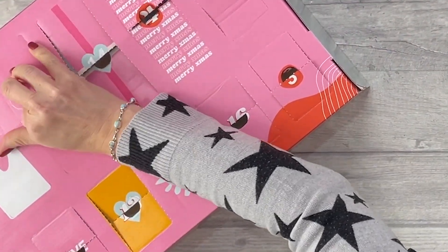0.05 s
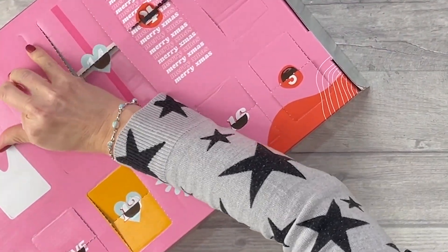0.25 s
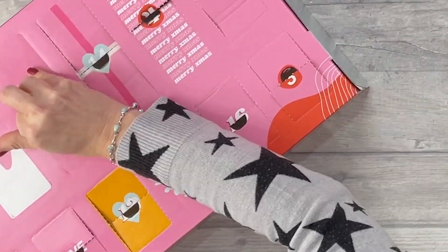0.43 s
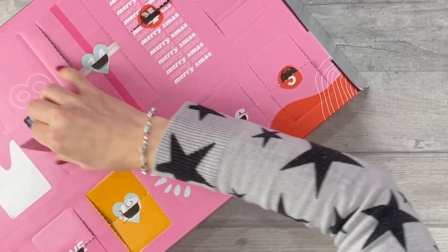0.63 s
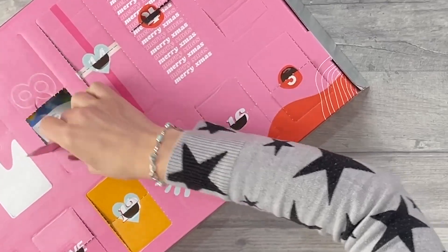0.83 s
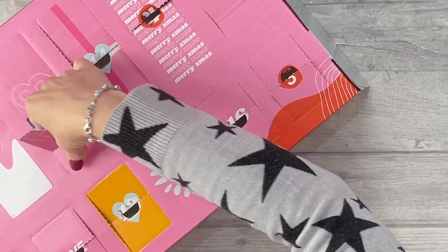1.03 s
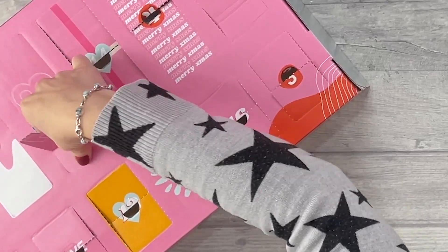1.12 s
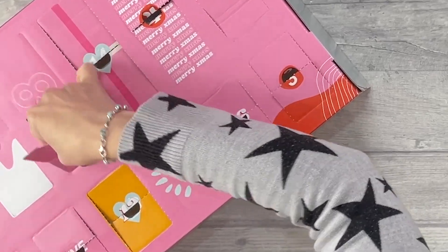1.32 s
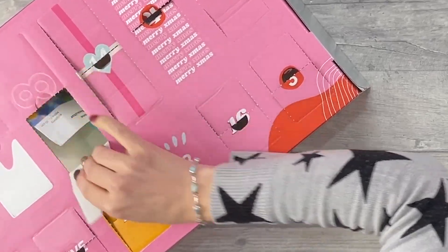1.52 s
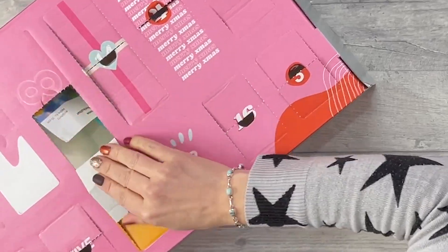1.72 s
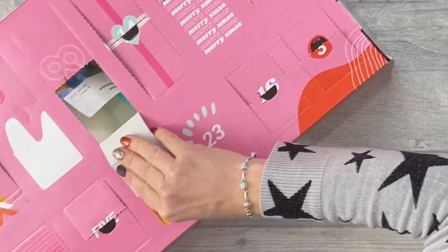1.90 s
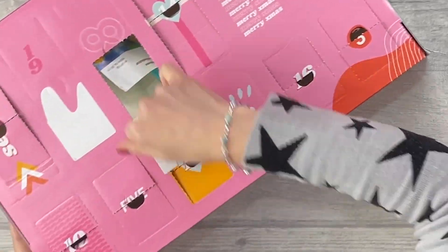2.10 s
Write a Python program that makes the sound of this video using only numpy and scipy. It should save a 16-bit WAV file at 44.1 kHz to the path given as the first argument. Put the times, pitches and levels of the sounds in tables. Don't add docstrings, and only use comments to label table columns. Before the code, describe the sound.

Perforated cardboard torn open: one loud hollow pop, small fumbles, a crackling rip, then a palm rub

```python
import sys
import numpy as np
from scipy import signal
from scipy.fft import rfft, irfft, next_fast_len
from scipy.io import wavfile
from scipy.ndimage import uniform_filter1d, map_coordinates

SR = 44100
rng = np.random.default_rng(int(sys.argv[2]) if len(sys.argv) > 2 else 0)


def volts_from_decibels(level):
    exponent = np.asarray(level, float) / 20
    return 10 ** exponent


def store_wav(level_fs):
    pcm = np.round(np.clip(np.atleast_2d(level_fs), -1, 1) * 32767)
    wavfile.write(sys.argv[1], SR, pcm.T.astype(np.int16))


N = 94815


def unit(x):
    return x / np.sqrt(np.mean(x ** 2) + 1e-20)


def along(points, hz):
    f, v = np.transpose(points)
    return np.interp(np.log(hz + 1), np.log(f + 1), v)


def filtered(x, response):
    n = x.shape[-1]
    m = next_fast_len(n + 4096)
    return irfft(rfft(x, m) * response(np.fft.rfftfreq(m, 1 / SR)), m)[..., :n]


def coloured(x, spectrum):
    return filtered(x, lambda f: volts_from_decibels(along(spectrum, f)))


def peak(f, centre_hz, width_hz):
    return 1j * f * width_hz / (centre_hz ** 2 - f * f + 1j * f * width_hz)


def add(track, start_s, sound):
    i = round(start_s * SR)
    part = track[max(i, 0):][:len(sound) + min(i, 0)]
    part += sound[max(-i, 0):][:len(part)]


# level/dB, f/Hz
TREBLE_LIMIT = [(-21, 16000), (-11.5, 54000)]


def dulled(f, db):
    ratio = f / np.interp(db, *np.transpose(TREBLE_LIMIT))
    return 1 / (1.5 + 1.2j * ratio - ratio ** 2) ** 2


def gritty(n, grain_db):
    grain_samples = 24
    strength = np.minimum(rng.exponential(1, n // grain_samples + 1), 3)
    strength = np.repeat(strength, grain_samples)[:n]
    return unit(rng.standard_normal(n) * volts_from_decibels(grain_db * strength))


# f/Hz, coherence/1
COHERENCE = [(60, 0.95), (240, 0.96), (950, 1), (3770, 1), (15000, 0.37)]


def pair(x):
    def split(hz):
        angle = np.arccos(np.clip(along(COHERENCE, hz), -1, 1)) / 2
        return np.array([np.cos(angle), np.sin(angle)])

    mid, side = filtered(x, split)
    return np.array([mid + side, mid - side])


# f/Hz, density/(dB/Hz)
AIR_SPECTRUM = [(60, -10), (300, -10.5), (1200, -20.5), (2200, -26.5), (5000, -27.5), (11500, -31),
                (13500, -41.5)]
# f/Hz, density/(dB/Hz)
RUMBLE_SPECTRUM = [(15, -3), (40, 6.5), (120, -17)]
# middle t/s, length/s, level/dB, f/Hz
TABLE_SWAYS = [
    (0.309, 0.14, -40.5, 32.96),
    (0.642, 0.49, -57, 26.56),
    (1.15, 0.081, -49.5, 27.8),
    (1.24, 0.074, -31.5, 143),
    (1.299, 0.078, -44, 70.6),
    (1.595, 0.015, -41.5, 114),
    (1.832, 0.045, -44.5, 74.7),
]


def background():
    air_db, rumble_db = -66, -64
    t = np.arange(N) / SR
    air = unit(pair(coloured(rng.standard_normal((2, N)), AIR_SPECTRUM)))
    rumble = unit(coloured(rng.standard_normal(N), [(5, -60), *RUMBLE_SPECTRUM, (250, -90)]))
    sway = np.zeros(N)
    for middle_s, length_s, db, hz in TABLE_SWAYS:
        since = t - middle_s
        sway += volts_from_decibels(db) * np.exp(-8 * (since / length_s) ** 2) * np.cos(2 * np.pi * hz * since)
    return volts_from_decibels(air_db) * air + volts_from_decibels(rumble_db) * rumble + sway


# f/Hz, t60/s
ROOM_DECAY = [(100, 0.18), (250, 0.17), (500, 0.18), (2000, 0.24), (6000, 0.12), (14000, 0.32)]


def room(x):
    level_db, delay_s, dull_hz, knee_s = -10.5, 0.0028, 7000, 0.35
    out, step = np.zeros((2, N + SR)), SR // 5
    delay = round(delay_s * SR)
    for i in range(0, N, step):
        hz, t, z = signal.stft(rng.standard_normal((2, SR // 2)), SR, nperseg=256)
        decay = volts_from_decibels(-60 * t * (0.87 + t / knee_s) / along(ROOM_DECAY, hz)[:, None])
        tail = pair(signal.istft(z * decay, SR, nperseg=256)[1])
        wet = signal.fftconvolve(x[None, i:i + step], tail / np.linalg.norm(tail[0]), axes=1)
        out[:, i + delay:][:, :wet.shape[1]] += wet
    return volts_from_decibels(level_db) * filtered(out[:, :N], lambda f: 1 / (1 + 1j * f / dull_hz))


# t/s, level/dB
SLIDE_LEVEL = [(1.57, -74), (1.63, -38.5), (1.68, -36), (1.72, -35.5), (1.79, -43.5), (1.86, -39),
               (1.94, -36), (2.0, -39), (2.05, -45), (2.075, -56), (2.13, -88.5)]
# f/Hz, density/(dB/Hz)
SKIN_SPECTRUM = [(200, -37), (500, -11.5), (2500, -5.5), (4200, -7.5), (6000, -9.5), (7400, -15),
                 (9000, -11.5), (15500, -31.5)]


def slide():
    full_speed_s, brightens_db_per_s, split_hz, flutter_hz = 1.735, 131, 2300, 60
    t = np.arange(N) / SR
    body_flutter, treble_flutter = [map_coordinates(rng.standard_normal(200), [t * flutter_hz]) for _ in range(2)]
    grit = np.array([gritty(N, grain_db=1.5), gritty(N, grain_db=0.5)])
    skin = unit(pair(coloured(grit, SKIN_SPECTRUM)))
    body = filtered(skin, lambda f: 1 / (1 + (f / split_hz) ** 4))
    body_db = np.interp(t, *np.transpose(SLIDE_LEVEL))
    treble_db = body_db + brightens_db_per_s * np.minimum(t - full_speed_s, 0)
    treble = volts_from_decibels(treble_db + 0.67 * treble_flutter) * (skin - body)
    return volts_from_decibels(body_db + 2.0 * body_flutter) * body + treble


# start t/s, rise/s, t60/s, level/dB, f/Hz
RUB_EVENTS = [(-.01, 0.004, 0.18, -38.5, 926), (-.01, 0.011, 0.18, -44.5, 4380),
              (0.102, 0.0076, 0.29, -59, 940), (.404, .015, 0.29, -39.5, 1945),
              (0.586, 0.025, 0.27, -52, 1130), (0.664, 0.0082, 0.242, -38, 1190),
              (0.704, 0.0057, 0.39, -49, 4600), (0.839, 0.01, 0.17, -48, 7500),
              (0.90, 0.021, 0.2, -58, 594), (.745, 0.028, 0.13, -52, 1083), (1.06, 0.0069, .06, -64, 1300),
              (0.868, 0.038, 0.23, -62, 5340), (1.102, .02, 0.23, -66, 4980),
              (1.195, 0.031, 0.17, -19, 1000), (1.203, 0.038, 0.28, -24.5, 3200),
              (1.429, 0.0216, 0.089, -52, 1600), (1.455, 0.0075, 0.212, -34, 1480),
              (1.529, 0.022, 0.52, -42.5, 1482), (1.455, 0.0192, 0.61, -53.5, 7000)]


def rubs():
    knee_s = 0.35
    out, t = np.zeros(N), np.arange(SR // 2) / SR
    for s, rise_s, t60, db, hz in RUB_EVENTS:
        swell = np.minimum(t / rise_s, 1) ** 2
        decay = volts_from_decibels(-60 * np.maximum(t - rise_s, 0) / t60 * (1.09 + t / knee_s))

        def colour(f):
            contact = peak(f, hz, 1.27 * hz) ** 2 * dulled(f, db + 12)
            box = volts_from_decibels(0.5) * peak(f, 320, 390) ** 2
            return contact + box

        grit = unit(filtered(gritty(len(t), grain_db=2.0), colour))
        add(out, s, volts_from_decibels(db) * swell * decay * grit)
    return out


# t/s, peak level/dB, f/Hz, t60/s
KNOCK_EVENTS = [(0.348, -44.5, 299, 0.15), (.372, -43, 450, 0.039), (0.3825, -28.5, 336, 0.055),
                (.394, -33, 320, 0.073), (.418, -38.5, 257, 0.066), (.435, -34, 461, 0.089),
                (0.485, -41, 319, 0.17), (.578, -37, 397, 0.082), (0.596, -33.5, 340, 0.08),
                (.662, -19.5, 360, 0.026), (.6625, -33, 699, 0.15), (.674, -35.5, 353, .05),
                (0.713, -42.5, 344, 0.097), (.740, -41, 257, 0.27), (.850, -47.5, 295, 0.19),
                (0.907, -52, 449, 0.19), (1.004, -49, 315, 0.1), (1.2052, -33, 620, 0.06),
                (1.213, -24, 760, 0.057), (1.2180, -11, 409, 0.03), (1.2263, -7.5, 346, 0.032),
                (1.2348, -20.5, 480, 0.022), (1.2415, -11.5, 409, 0.03), (1.2508, -21, 340, 0.035),
                (1.285, -43, 357, 0.029), (1.453, -27, 601, 0.053), (1.5123, -26, 390, 0.024),
                (1.5235, -30, 332, 0.082), (1.534, -32.5, 686, 0.042), (1.546, -40.5, 412, 0.066),
                (1.563, -28, 686, 0.037), (1.582, -30, 333, 0.045), (1.717, -37.5, 725, 0.2),
                (1.702, -41, 407, 0.031), (1.756, -31.5, 402, 0.083), (1.784, -25.5, 221, 0.064),
                (1.819, -22.5, 424, 0.035), (1.832, -27.5, 520, 0.023), (1.895, -50.5, 436, 0.2),
                (1.93, -38, 729, 0.079), (1.972, -32.5, 236.5, 0.14), (2.079, -49, 238, 0.04)]


def knocks():
    spread, rattle_db, rattle_loss_db_per_s = 1.38, -4, 15.5
    soft_per_s, lowest_hz = 0.062, 166
    out, t = np.zeros(N), np.arange(SR // 4) / SR
    for s, db, hz, t60 in KNOCK_EVENTS:
        rattle = filtered(gritty(len(t), grain_db=4.5), lambda f: peak(f, 1.193 * hz, spread * hz) ** 2)
        decay = volts_from_decibels(-75 * t / t60)
        rattle = unit(decay * rattle) * np.sqrt(np.mean(decay ** 2))
        note = volts_from_decibels(-60 * t / t60) * np.sin(2 * np.pi * hz * t)
        ring = note + volts_from_decibels(rattle_db - rattle_loss_db_per_s * t60) * rattle
        onset = 1 - np.exp(-t / (0.00015 + soft_per_s * t60 ** 2))
        add(out, s, -volts_from_decibels(db + 2.0) * ring * onset)
    return filtered(out, lambda f: (1j * f / (lowest_hz + 1j * f)) ** 2)


# t/s, peak level/dB, f/Hz, t60/s
CRACK_EVENTS = [(.118, -55.5, 4030, 0.0061), (.187, -40.5, 7880, 0.013), (.2150, -10, 5980, 0.017),
                (.2015, -33, 8650, 0.0076), (.2525, -20, 11520, 0.0058), (.3815, -38, 6080, 0.0062),
                (.4075, -32, 2600, .01), (.408, -27, 7530, 0.014), (.426, -27, 1864, 0.03),
                (.4535, -31.5, 2993, 0.0037), (.557, -50.5, 6000, 0.004), (.5945, -45, 2990, 0.0035),
                (.617, -45.5, 8900, 0.0036), (.662, -26, 1167, 0.014), (.670, -23, 4880, 0.006),
                (.7115, -25.5, 5120, 0.006), (1.006, -55, 5520, 0.0071), (1.2022, -41.5, 5000, .02),
                (1.2055, -29, 3180, 0.03), (1.2125, -14, 3962, 0.012), (1.2135, -16.5, 1129, .012),
                (1.2215, -14.5, 2532, 0.011), (1.2255, -10.5, 5810, .006), (1.2272, -8, 2930, 0.008),
                (1.2278, -18.5, 10430, 0.0079), (1.2352, -2, 5080, 0.006), (1.2368, -15.5, 2638, 0.0084),
                (1.2385, -16, 5486, 0.031), (1.2415, -20, 2520, 0.005), (1.2462, -20.5, 2875, 0.018),
                (1.2545, -23.5, 6000, .012), (1.453, -23, 2003, 0.007), (1.4545, -32, 2506, .006),
                (1.4568, -28.5, 2419, 0.0061), (1.470, -35, 6300, 0.0093), (1.482, -36.5, 2510, 0.0047),
                (1.4875, -44.5, 2700, 0.0033), (1.510, -43.5, 4170, .01), (1.5355, -31, 1820, 0.014),
                (1.5325, -30, 3180, 0.023), (1.5625, -34.5, 5060, 0.0021), (1.5632, -29, 1640, 0.012),
                (1.595, -44.5, 4000, 0.0032), (1.633, -50, 1970, 0.0067), (1.8175, -19.5, 2340, 0.0082),
                (1.9306, -20, 4130, 0.013)]


def cracks():
    ticks_per_s, tick_db = 14, -67
    width, echo, echo_s = 1.1, 0.14, 0.00037
    out, t = np.zeros(N), np.arange(2048) / SR
    draws = rng.random((round(ticks_per_s * N / SR), 3))
    stray = [(N / SR * a, tick_db + 8 * b, 4000 + 7000 * c, 0.004) for a, b, c in draws]
    for s, db, hz, t60 in [*CRACK_EVENTS, *stray]:
        burst = 0.5 * volts_from_decibels(-60 * t / t60) * gritty(len(t), grain_db=1.5)
        burst[0] = -1.2

        def colour(f):
            bounce = 1 - echo * np.exp(-2j * np.pi * f * echo_s)
            return peak(f, hz, width * hz) ** 2 * dulled(f, db) * bounce

        snap = filtered(burst, colour)
        add(out, s, volts_from_decibels(db) * snap / np.abs(snap).max())
    return out


# f/Hz, density/(dB/Hz)
BURST_SPECTRUM = [(350, -24), (700, -8.5), (2900, -6), (4300, -14.5), (5900, -4), (7600, -9.5), (11500, -5),
                  (15800, -18.5)]
# f/Hz, level/dB, t60/s
LID_MODES = [(73.67, -4, 0.089), (156, 1.5, 0.066), (340, -1, 0.046), (465, -3, 0.047), (858.6, -10, 0.07),
             (1166, -27, 0.22)]
# f/Hz, width/Hz, level/dB
POCKET_MODES = [(1000, 500, -6.5), (2910, 290, 0.5), (5660, 560, 0.5), (8000, 1900, -12.5)]


def pop():
    start_s, lid_lag_s = 0.2055, 0.0015
    burst_db, burst_s, swell_s, first_snap = -3.5, 0.0058, 0.007, 0.68
    thump_db, hiss_db, hiss_t60 = -1.5, -13, 0.2
    out, t = np.zeros(N), np.arange(SR // 2) / SR

    volley = np.minimum(t / 0.00011, 1) * np.minimum(first_snap + t / swell_s / 2, 1)
    volley = volley * volts_from_decibels(-60 * np.maximum(t - burst_s, 0) / 0.0066)
    burst = unit(coloured(gritty(len(t), grain_db=0.0), BURST_SPECTRUM))

    def pocket(f):
        return sum(volts_from_decibels(db) * np.abs(peak(f, hz, 2 * width_hz)) ** 2 for hz, width_hz, db in POCKET_MODES)

    hiss = unit(filtered(rng.standard_normal(len(t)), pocket))
    hiss = volts_from_decibels(hiss_db - 60 * t / hiss_t60) * np.minimum(t / 0.0067, 1) * hiss

    thump = sum(volts_from_decibels(db - 60 * t / t60) * np.sin(2 * np.pi * hz * t) for hz, db, t60 in LID_MODES)
    thump = thump * (1 - np.exp(-t / 0.0045))
    add(out, start_s, volts_from_decibels(burst_db) * volley * burst + hiss)
    add(out, start_s + lid_lag_s, volts_from_decibels(thump_db) * thump)
    return out


def scene():
    near = pop() + cracks() + knocks() + rubs()
    return near + room(near) + slide() + background()


def band_limit(x):
    return signal.sosfilt(signal.butter(12, 16000, fs=SR, output="sos"), x)


def record(dry):
    left_lead_s, left_db, roll_hz = 2.15e-5, -1.47, 14500
    hush_db, hush_below_db, hush_s, hush_hz = 3.5, -63.5, 0.03, 180
    clip_top, clip_hard = 0.99, 17
    side = np.array([[0.5], [-0.5]])

    def ports(f):
        roll = 1 / (1 + (f / roll_hz) ** 6) ** 0.5
        return volts_from_decibels(side * left_db) * roll * np.exp(2j * np.pi * f * side * left_lead_s)

    x = filtered(dry, ports)
    upper = filtered(x, lambda f: 1 - 1 / (1 + (f / hush_hz) ** 4))
    power = np.abs(uniform_filter1d(np.mean(upper ** 2, axis=0), round(hush_s * SR)))
    gain = volts_from_decibels(-hush_db / (1 + power / volts_from_decibels(2 * hush_below_db)))
    x = x + upper * (gain - 1)
    x = x / (1 + np.abs(x / clip_top) ** clip_hard) ** (1 / clip_hard)
    return band_limit(x)


dry = scene()
out = record(dry)
store_wav(out)
```